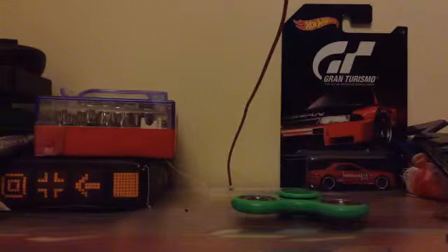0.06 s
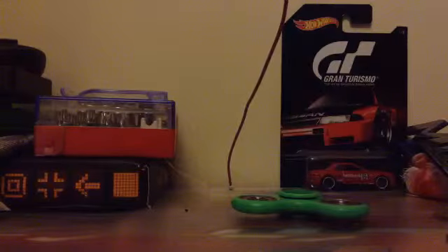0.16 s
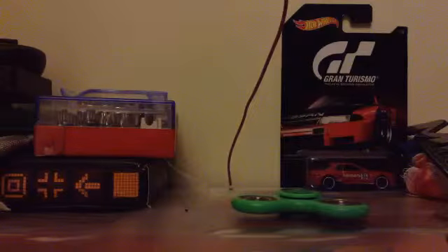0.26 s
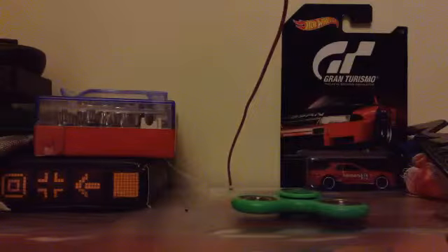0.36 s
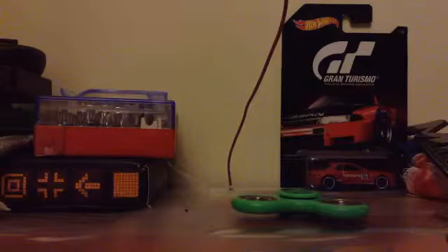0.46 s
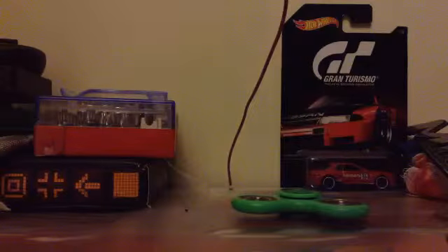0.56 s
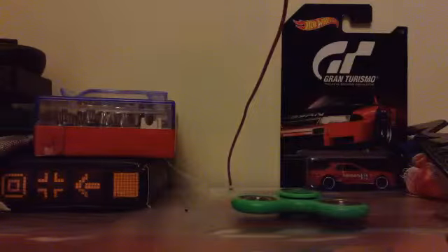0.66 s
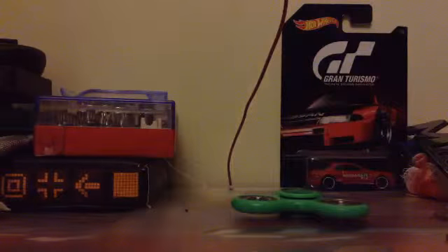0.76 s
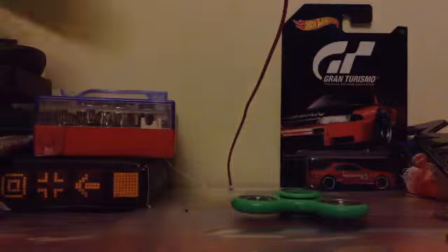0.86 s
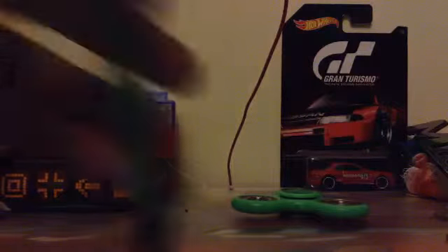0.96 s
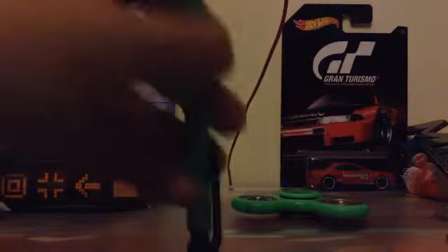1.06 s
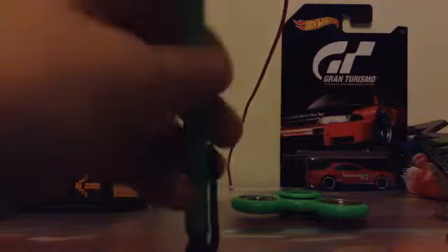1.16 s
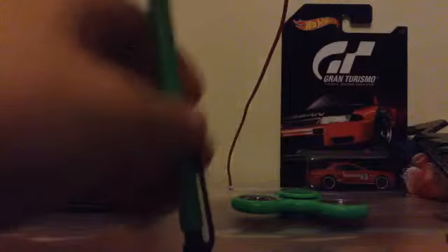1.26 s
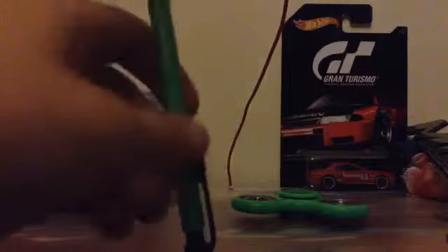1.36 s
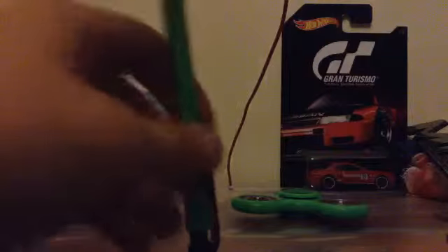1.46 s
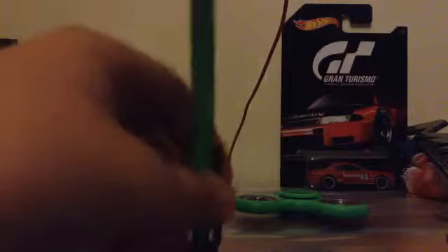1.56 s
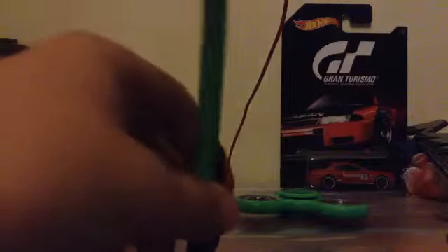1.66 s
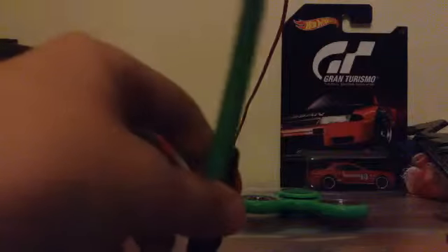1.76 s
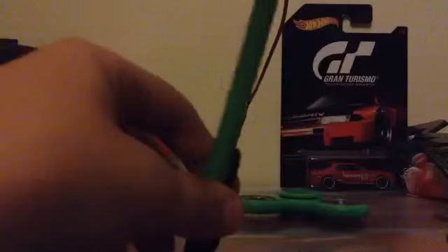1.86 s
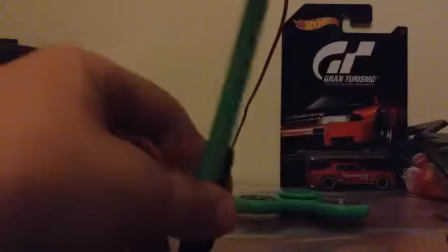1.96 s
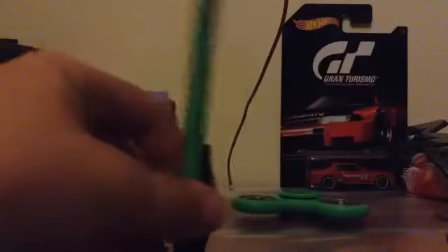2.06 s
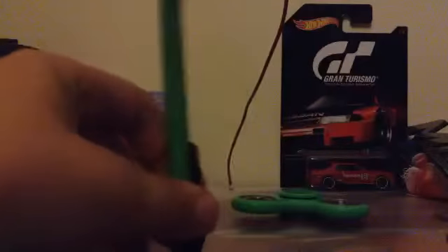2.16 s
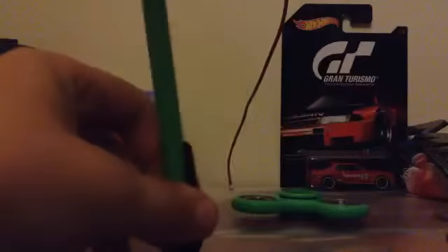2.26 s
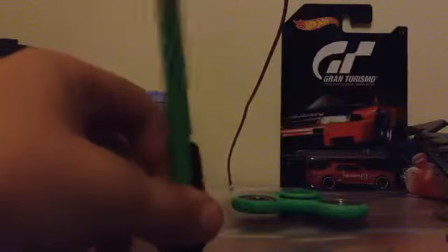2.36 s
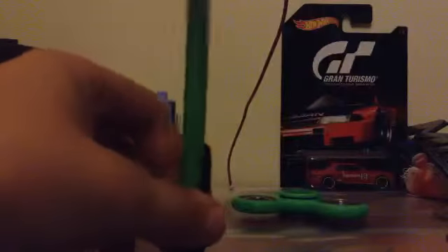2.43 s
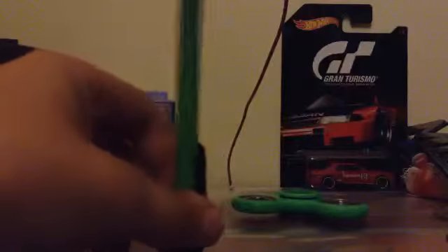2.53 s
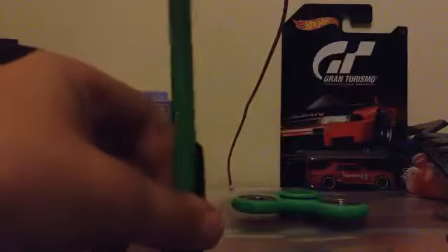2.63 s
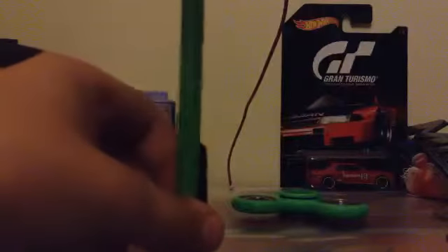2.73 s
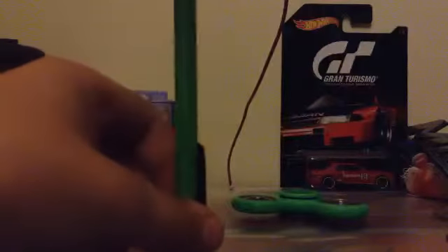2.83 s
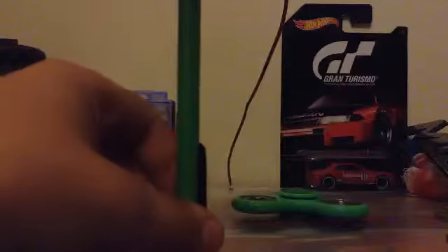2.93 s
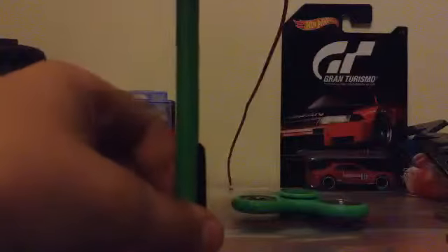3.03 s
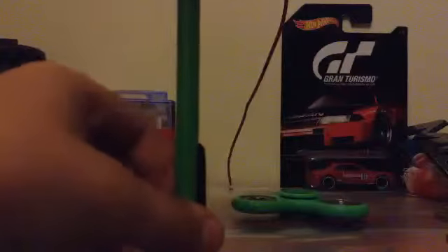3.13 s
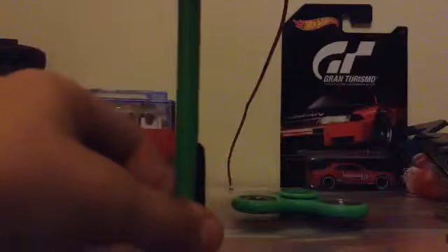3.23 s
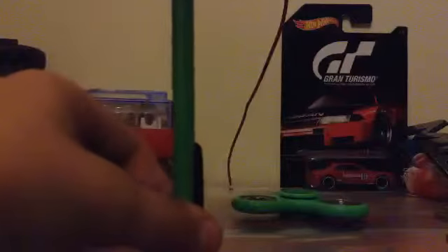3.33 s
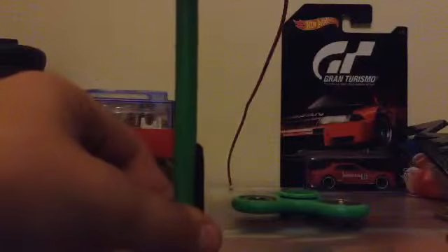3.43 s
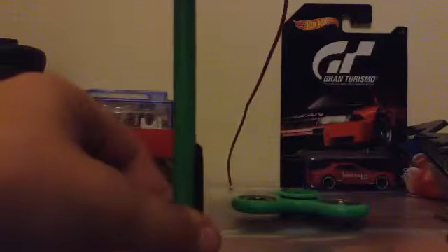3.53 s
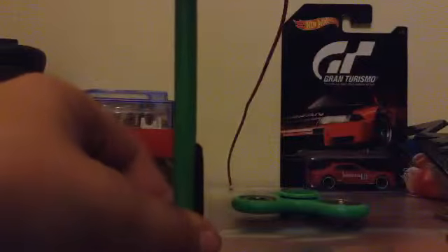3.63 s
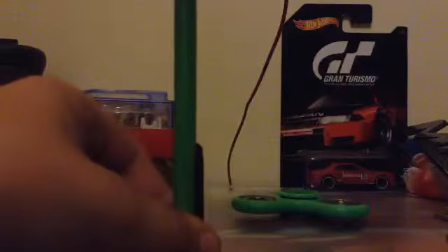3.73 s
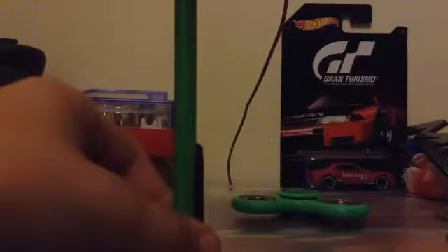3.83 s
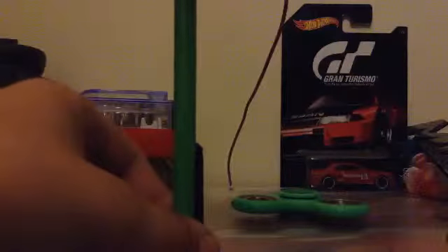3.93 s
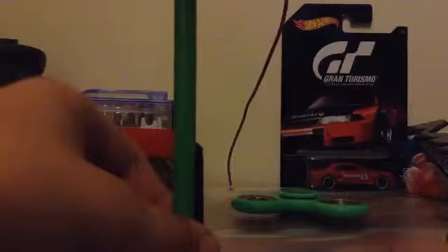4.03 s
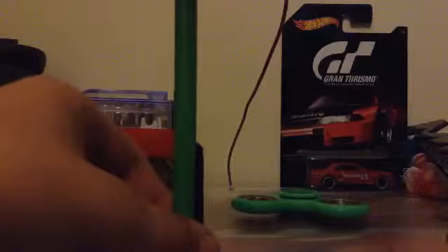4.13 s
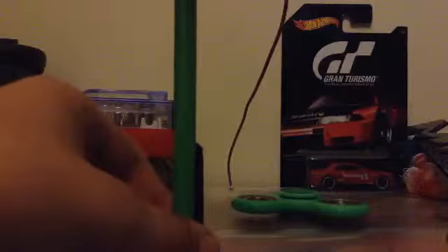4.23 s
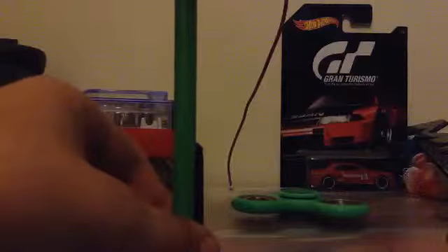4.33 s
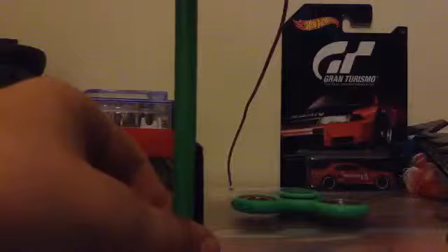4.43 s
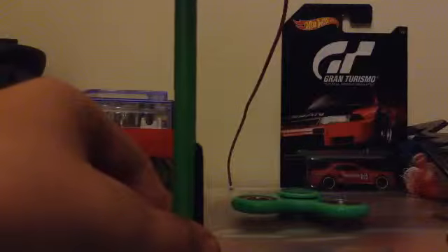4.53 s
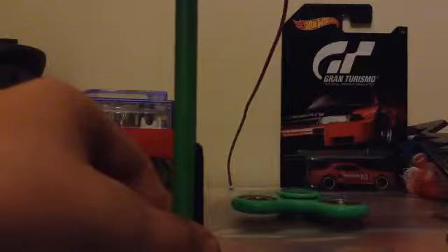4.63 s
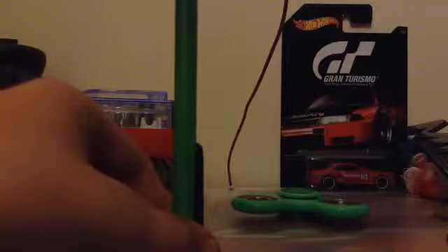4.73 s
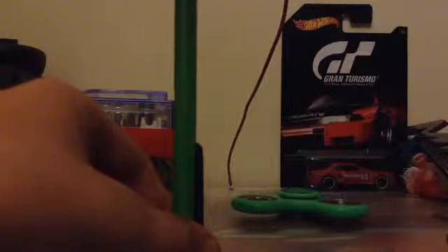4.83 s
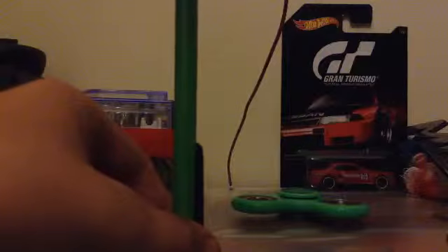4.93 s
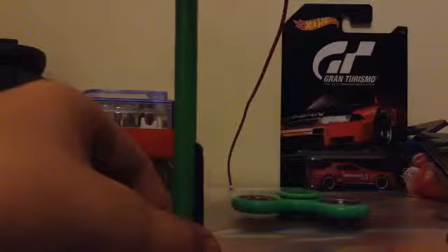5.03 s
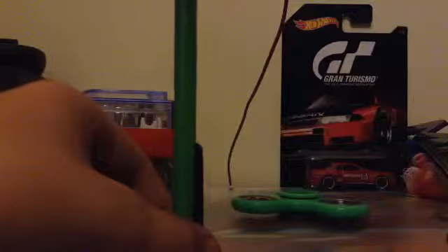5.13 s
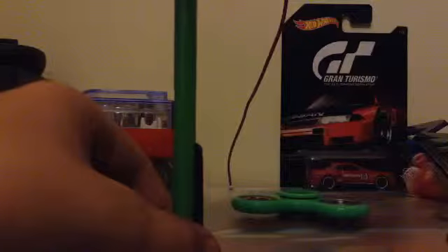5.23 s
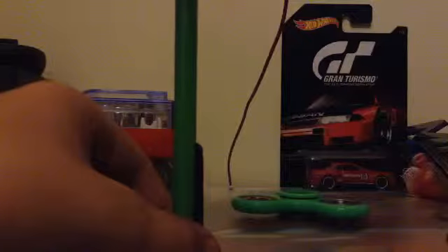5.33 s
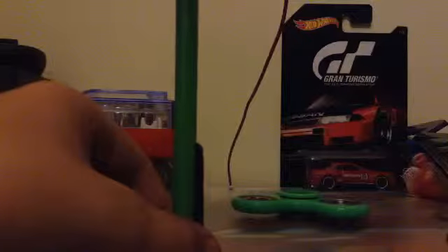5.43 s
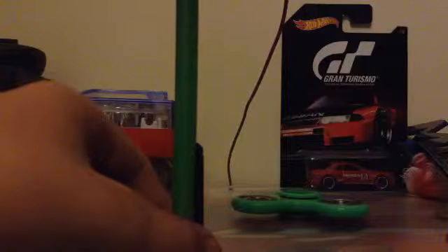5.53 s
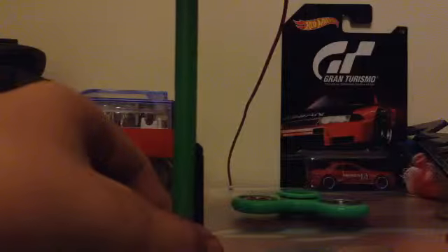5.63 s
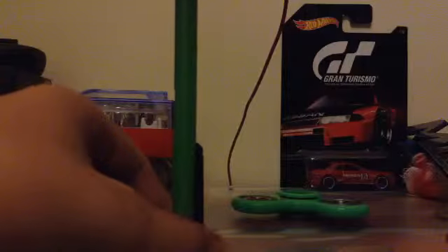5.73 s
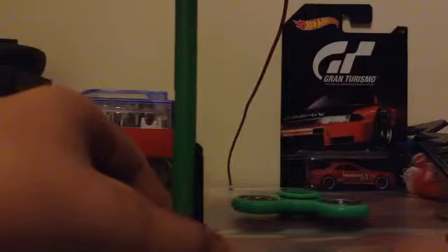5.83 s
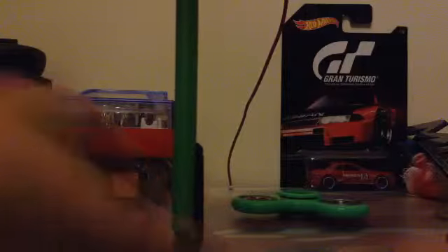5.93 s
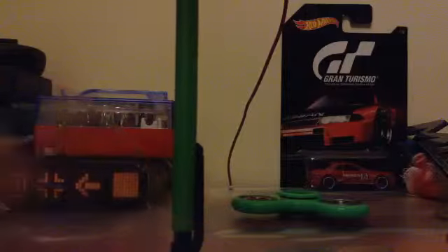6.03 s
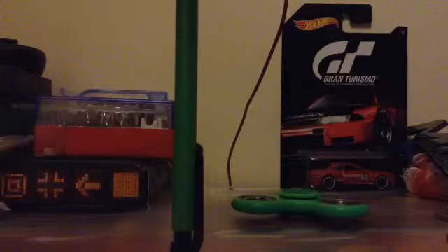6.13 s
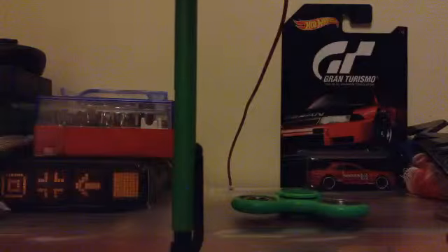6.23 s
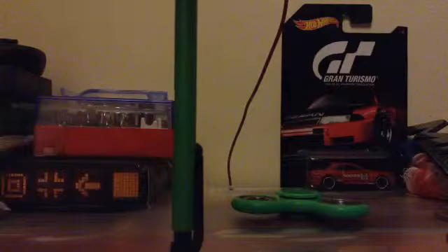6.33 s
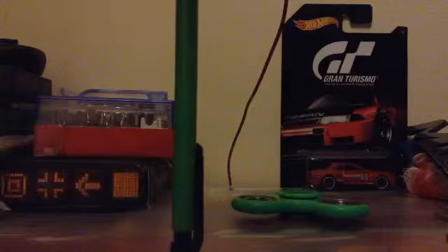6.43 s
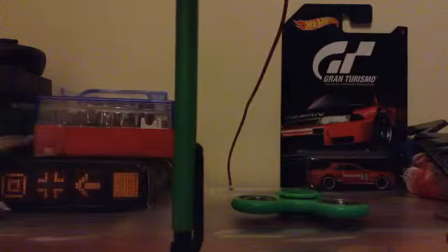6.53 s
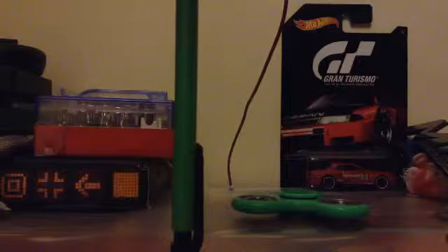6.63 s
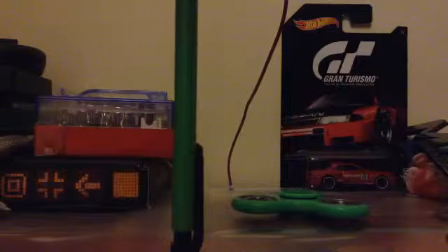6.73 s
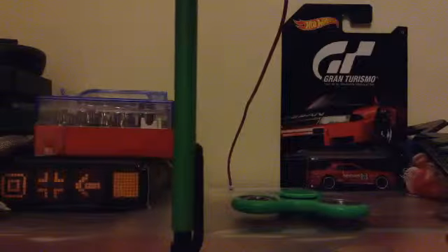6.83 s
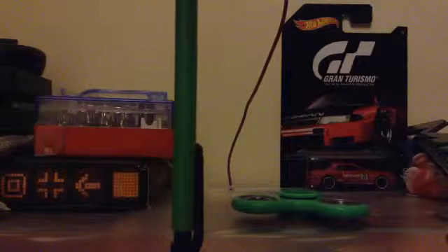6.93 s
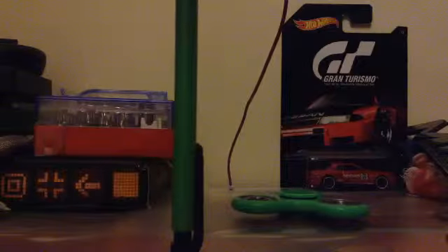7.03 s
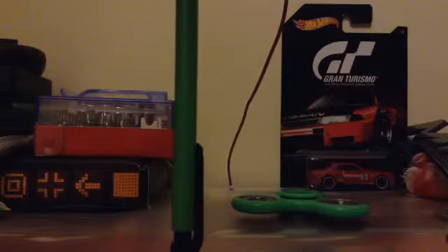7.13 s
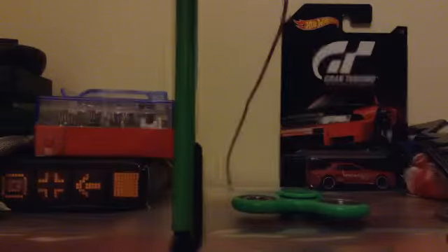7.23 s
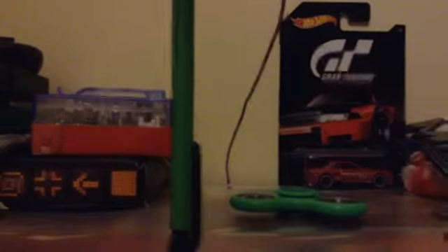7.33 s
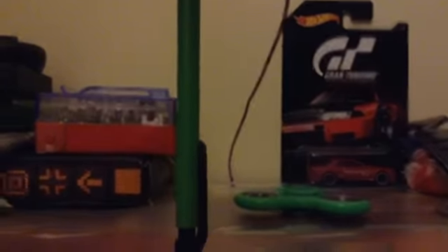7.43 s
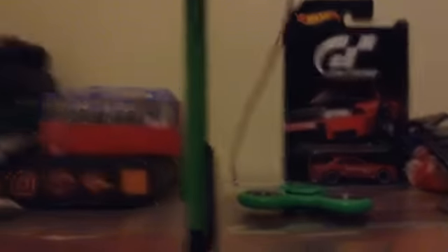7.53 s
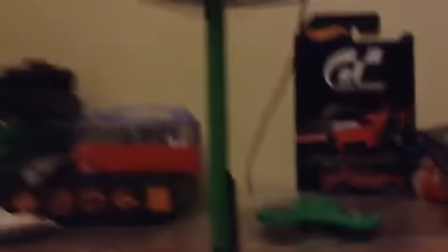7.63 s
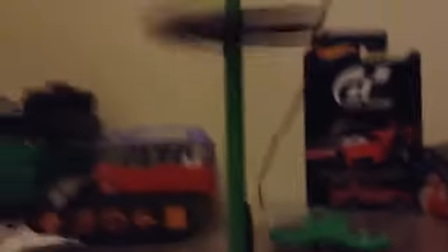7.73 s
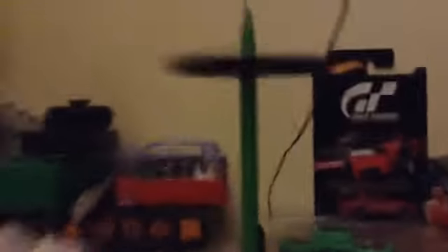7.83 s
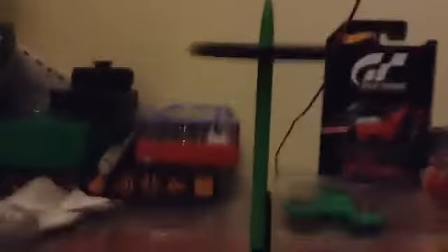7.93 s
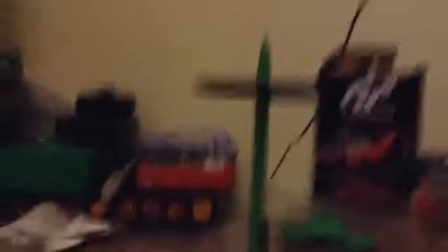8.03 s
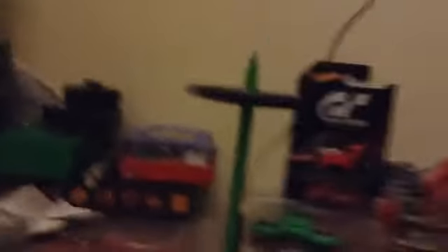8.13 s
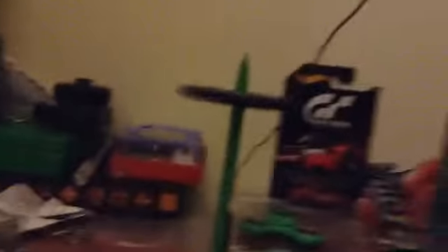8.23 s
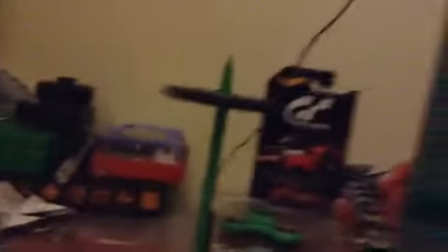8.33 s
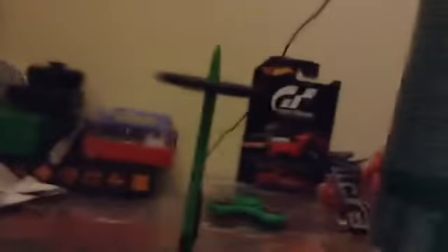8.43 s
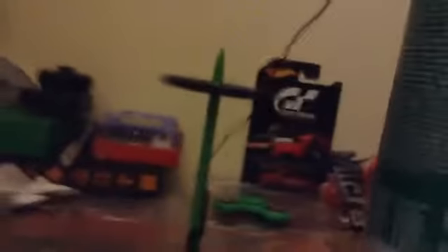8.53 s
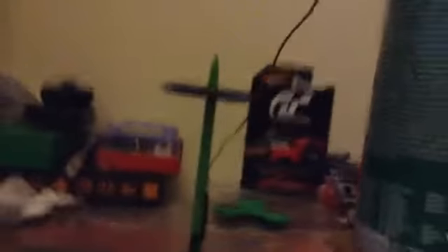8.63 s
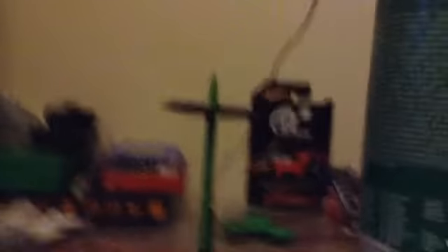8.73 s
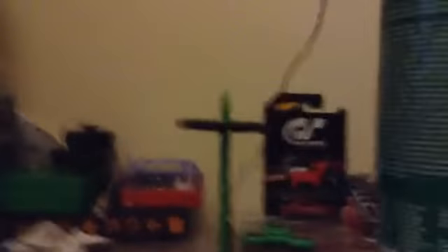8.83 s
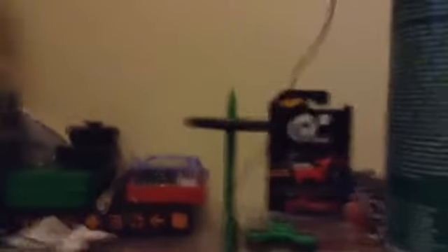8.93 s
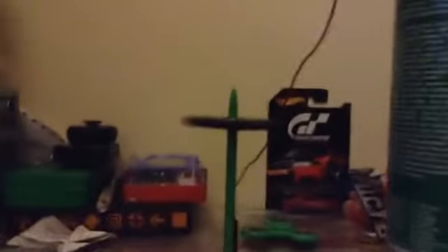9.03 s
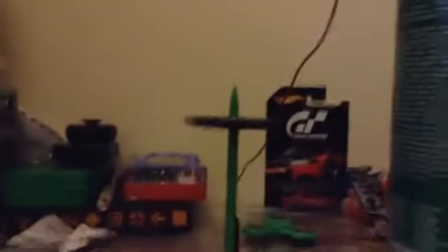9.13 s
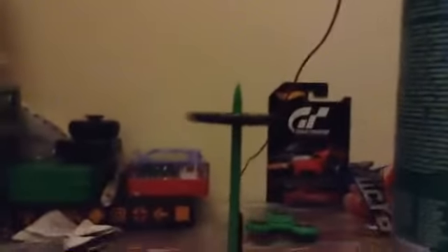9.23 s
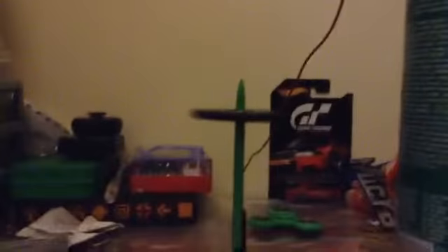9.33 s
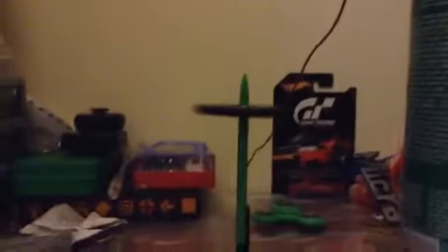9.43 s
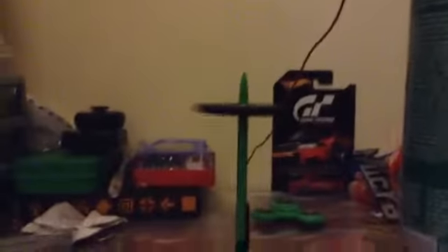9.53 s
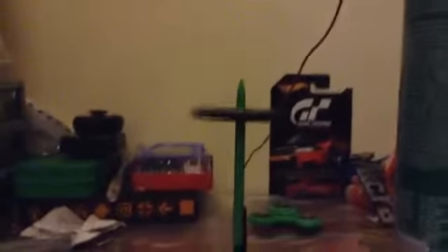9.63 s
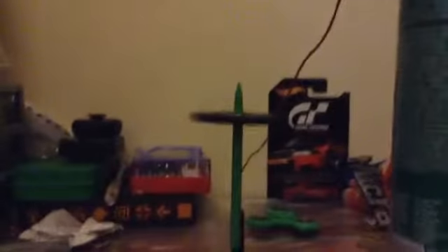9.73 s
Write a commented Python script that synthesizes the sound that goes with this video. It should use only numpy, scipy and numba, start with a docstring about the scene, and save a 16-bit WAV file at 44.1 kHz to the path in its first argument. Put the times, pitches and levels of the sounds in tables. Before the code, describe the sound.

Continuous whirring bearing hiss from a fidget spinner on a pencil, with handling thuds and ticks, buzzing desk rumble, a sharp snap, and a distant rattly ending.

```python
"""A whirring fidget spinner is carried in on a pencil, set on a desk, tilted upright, steadied and let go.
Throughout, its dry ball bearing hisses into the air and off the desk top, and rings the spinner's body.
From touchdown it also rumbles down the pencil into the desk; thuds, ticks and finger rubs mark the handling.
The foot snaps flat on release; as the rotor slows, the loose bearing rattles once a turn.
Near the end the microphone draws back. Sources are random collisions through filters and resonances."""
import sys
import numpy as np
from scipy import signal
from scipy.fft import rfft, irfft, next_fast_len
from scipy.io import wavfile
from scipy.ndimage import uniform_filter1d, map_coordinates
from numba import njit

SR = 44100
rng = np.random.default_rng(int(sys.argv[2]) if len(sys.argv) > 2 else 0)


def bounce(signal):
    """Save signal as a 16-bit WAV file at the path given by the first command-line argument."""
    frames = np.transpose(np.atleast_2d(signal))
    limited = np.clip(frames, -1, 1)
    pcm = np.round(limited * 32767).astype(np.int16)
    wavfile.write(sys.argv[1], SR, pcm)


N = 431298
T = np.arange(N) / SR

# Coasting spinner. Each row: time in seconds, turns per second in Hz, relative once-a-turn rattle.
SPIN = [(0, 40.9, 0.46), (2, 37.63, 0.67), (4.5, 34.22, 0.26), (5.2, 33.21, 1), (7.4, 31.02, 0.58),
        (7.9, 30.39, 1.75), (9.78, 28.81, 3.3)]
# Microphone distance. Each row: time in seconds, distance in metres.
DISTANCE_M = [(0, 0.42), (.38, 0.49), (.65, 0.21), (.98, 0.094), (1.35, 0.12), (1.88, 0.15), (2.27, 0.13),
              (3.1, 0.15), (3.8, 0.19), (7.55, 0.21), (8.05, 0.27), (8.8, 0.41), (9.78, 0.45)]
# Hiss colour by place. Each row: frequency in Hz, relative level in dB.
ASIDE = [(1500, -12), (1900, -16), (2210, -1), (2920, -4.5), (3780, -11.5), (4700, -8), (5560, -4.5),
         (6940, -4.5), (7640, -11.5), (9450, -5), (10300, -10), (11300, -14), (12900, -23), (15000, -17)]
PASSING = [(880, -33), (1500, -5), (2620, -5), (3270, -7), (4840, 4.5), (5710, 4.5), (7010, 4.5),
           (8520, -2), (10400, 2.5), (12100, -6), (14300, 4.5), (15400, -19)]
IN_HAND = [(2100, -22), (2280, -8), (2790, -13.5), (3520, -2), (4230, -10.5), (5090, -2), (6220, -8.5),
           (7050, -2), (8680, -4), (9920, 0), (11600, -8.5), (14200, -1), (15400, -2.5)]
STANDING = [(1400, -4), (2210, -1.5), (2770, -5.5), (3110, -9.5), (3670, -1.5), (4200, -11.5), (5000, -1.5),
            (5650, -3.5), (6030, -28), (6400, -21), (6820, 0.5), (9520, -7), (10500, -1), (11400, -20),
            (14200, 3.5), (15400, -6)]
DISTANT = [(1350, -13), (1850, 1.5), (2250, -1), (2670, -2), (2920, -11), (3700, -2), (4540, -14),
           (4950, -7), (6400, -23), (8330, -12.5), (10100, 2), (11500, -22), (14300, -14.5)]
# Each place gives way to the next. Each row: start in seconds, end in seconds.
PLACE_MOVES = [(.47, 0.93), (1.4, 2.03), (3.0, 5.95), (7.55, 8.96)]
# Hiss bands that flicker independently: edges in Hz.
HISS_EDGES_HZ = [20, 2800, 4500, 8200, 11500, 20000]
# Song of the steel races. Each row: time in seconds, level against the hiss in dB.
RACE_LEVEL_DB = [(.8, -31), (1.35, -10.5), (5.5, -5.5), (6.5, -1.5), (7.6, -3), (8.6, -12.5)]
# Race resonances. Each row: frequency in Hz, relative width, then relative level in dB
# in hand, standing and from afar.
RACE_MODES = [(3640, 110, -7, -11, -1), (6650, 490, 7, 4.5, -1), (7110, 480, 9, -1, 2)]
# The hand cups the bearing. Each row: time in seconds, length in seconds, centre in Hz,
# level against the hiss in dB.
CUPPINGS = [(.21, .13, 6250, -6), (.34, 0.15, 3320, -5.5), (0.612, 0.26, 6070, -7),
            (1.333, 0.32, 7200, -3.5), (1.633, 0.37, 3320, -7.5), (2.29, 0.23, 3410, -9.5),
            (4.012, 1.2, 2830, -12)]
# Desk-top reflection of the hiss. Each row: time in seconds, lag in ms, share of the direct sound.
MIRROR = [(.3, 0.3, 0.13), (.62, 0.29, 0.29), (.97, 0.14, 0.19), (1.15, 0.083, 0.22), (1.4, 0.13, 0.024),
          (7.5, 0.1, 0.027), (7.7, 0.19, 0.3), (8.0, 0.27, 0.22)]
# Each grip gives way to the next, the last back to afar. Each row: start in seconds, end in seconds.
GRIPS = [(1.1, 1.2), (2.0, 3.07), (4.3, 4.7), (5.9, 6.3), (7.55, 8.1)]
# Spinner and pencil resonances. Each row: frequency in Hz, relative width, then relative level in dB
# from afar (also before touchdown), tilted, pressed upright, touched lightly and standing free.
BODY_MODES = [(772.5, 52, -10, -3.5, -8, -14, -8.5), (837, 168, -16, -7, -0.5, -2, -3),
              (990, 72, -0.5, -8.5, -1.5, -4.5, 0), (1013, 98, -13, -13, -1.5, -12, -15),
              (1585, 55, -0.5, -11, -17, -10.5, -10), (1670, 192, -5, -7.5, 0, -5.5, -4),
              (1930, 186, -2, -15, -11, -3.5, -0.5), (2714, 180, -3, -10.5, -10, -30, -10)]
# Desk resonances. Each row: frequency in Hz, relative width, then relative level in dB
# with the foot skidding, under the hand's weight and unloaded.
DESK_MODES = [(132, 26.4, -6, -9, 1), (208.3, 27, -2.5, 3, 0.5), (267, 36.4, 2, 3.5, 1),
              (376.6, 27, -2, -6.5, -5.5), (512, 160, -1.5, -8.5, -5.5)]
# Hand pressing the pencil on the desk. Each row: time in seconds, gain in dB.
PRESS_DB = [(1.25, 14), (2.4, 7), (2.5, 13), (3.2, 11.5), (4.05, 12), (4.55, 7), (6.2, 2)]
# The foot eases off the desk. Each row: start in seconds, end in seconds, contact loss in dB.
LIFTS = [(2.223, 2.27, 7), (2.33, 2.362, 7), (2.824, 2.875, 18), (2.925, 3.048, 22), (3.354, 3.575, 24)]
# Struck desk. Each row: frequency in Hz, relative level in dB, t60 in seconds.
DESK_RING = [(134, -7, 0.19), (215, 0, 0.16), (268, -0.5, 0.1), (362, -3, 0.093), (513, -3.5, 0.052),
             (850, 4, 0.028), (1650, 13, 0.026)]
# Bumps of hand and foot. Each row: time in seconds, peak in dB, contact in ms, best-rung Hz at that spot.
BUMPS = [(0.098, -43, 0.3, 216), (1.043, -31.5, 1.1, 380), (1.056, -29, 1.5, 350),
         (1.1294, -15.5, 0.51, 246), (1.229, -31.5, 0.8, 400), (1.337, -31, 0.54, 880),
         (1.398, -30, 1, 880), (1.447, -30, 1.2, 400), (1.627, -35, 2.4, 240), (2.749, -33, 0.56, 280)]
# Dead knock of the snapping foot. Each row: frequency in Hz, relative level in dB, t60 in seconds.
SNAP_RING = [(303, 1, 0.035), (493, 11, 0.011), (654, 12, 0.012)]
# Ticks of the balls in their cage. Each row: time in seconds, peak in dB.
TICKS = [(1.146, -17.5), (1.2891, -21), (1.3418, -18), (1.4014, -24), (5.882, -18.5), (6.4898, -32),
         (6.903, -31)]
# Tick colour. Each row: frequency in Hz, relative level in dB.
STEEL = [(4500, -3.5), (7300, -2), (8700, -2), (12000, -15), (14500, 0.5)]
# Extra hard landings of the slowing rotor. Each row: time in seconds, peak in dB.
CLACKS = [(7.8332, -35.5), (8.0073, -32.5), (8.0406, -38.5), (8.174, -39), (8.2637, -35.5), (8.4383, -42),
          (8.7065, -44), (8.942, -43), (8.971, -36.5), (9.416, -42), (9.7357, -40)]
# Clack colour. Each row: frequency in Hz, relative level in dB.
PLASTIC = [(1100, -4.5), (3800, -1), (5500, -17)]
# Fingers sliding on the pencil. Each row: time in seconds, length in seconds, level in dB.
RUBS = [(0.869, 0.016, -44), (0.911, 0.081, -47.5), (6.07, 0.13, -44), (6.128, 0.017, -46)]
# Skin friction colour. Each row: frequency in Hz, relative level in dB.
SKIN = [(170, -1), (400, -2), (900, 0.5), (3000, 4), (4500, -5), (15000, -8)]
# Quiet room colour. Each row: frequency in Hz, relative level in dB.
ROOM = [(40, -14), (110, -12.5), (220, -6), (1000, -3), (15000, -7)]

# bearing layers at 1 m and starting speed, before contact gains
HISS_DB, RING_DB, RUMBLE_DB = -56.5, -64, -78.5
SPEED_POWER = 1.0
KNOCK_S = 9.147  # one moment at which the rotor falls across its play
TOUCH_S, SEAT_S = 1.099, 0.18  # foot first meets the desk; time to seat
LIFT_RAMP_S = 0.016
SNAP_S, SNAP_DB = 5.8845, -21  # foot snaps flat as the fingers leave
ROCK_S, ROCK_DB = 0.282, 9  # free pencil then rocks: duration, extra rumble
# the desk is the ring's sounding board: share of pressure dB, share of lift dB, offset in mid-air
RING_PRESS_SHARE, RING_LIFT_SHARE, RING_AIRBORNE_DB = 0.59, 0.16, -12.5
# leaning pencil rolls on its foot's edge: ring offset, rms wander and widening of modes as shares
TILT_DB, TILT_BEND, TILT_WIDEN = -4, .06, .7
RUMBLE_AFAR_DB, RING_AFAR_DB = -5, -0.95  # extra loss after the microphone draws back
SPOT_DB_PER_OCTAVE = 8.5  # loss of desk modes away from the spot's pitch
TOP_HZ = 15400


def undb(db):
    """Decibels to gain."""
    return 10 ** (np.asarray(db) / 20)


def unit(x):
    """Scale to rms 1."""
    return x / np.sqrt(np.mean(x ** 2))


def even(x):
    """Hold the power near 1 over a few turns, keeping faster flutter."""
    power = np.abs(uniform_filter1d(x ** 2, SR // 6))
    return x / np.sqrt(power + 1e-12)


def curve(rows, axis=1):
    """One table column, joined by straight lines in time."""
    rows = np.array(rows)
    return np.interp(T, rows[:, 0], rows[:, axis])


def ramp(start_s, length_s):
    """Rise from 0 to 1."""
    return np.clip((T - start_s) / length_s, 0, 1)


def spell(start_s, end_s, edge_s):
    """1 between two moments, with sloping edges."""
    return ramp(start_s - edge_s / 2, edge_s) - ramp(end_s - edge_s / 2, edge_s)


def swell(centre_s, length_s):
    """Bell-shaped rise and fall, peak 1."""
    return np.exp(-(2 * (T - centre_s) / length_s) ** 2)


def blend(states, moves):
    """Pass from each state to the next during its (start s, end s)."""
    out = states[0]
    for (start_s, end_s), state in zip(moves, states[1:]):
        share = ramp(start_s, end_s - start_s)
        out = (1 - share) * out + share * state
    return out


def walk(rate_hz):
    """Random levels held 1 / rate_hz s, slewed twice, rms 1."""
    hold = int(SR / rate_hz)
    steps = np.repeat(rng.standard_normal(N // hold + 1), hold)
    slewed = uniform_filter1d(uniform_filter1d(steps, hold), hold)
    return unit(slewed[:N])


def colour(x, points):
    """Filter by a (Hz, dB) spectrum, falling 12 dB per octave more below its first point; rms 1."""
    hz, db = np.transpose(points)
    size = next_fast_len(N)
    f = np.maximum(np.arange(size // 2 + 1) * SR / size, 1)
    gain = undb(np.interp(np.log(f), np.log(hz), db))
    gain = gain * np.minimum(f / hz[0], 1) ** 2
    return unit(irfft(rfft(x, size) * gain, size)[:N])


def add(out, start_s, sound):
    """Mix a short sound in at start_s."""
    i = int(start_s * SR)
    out[i:i + len(sound)] += sound[:N - i]


@njit
def bandpass(x, hz, width_hz):
    """State-variable resonance whose centre and width may move every sample."""
    y, band, low = np.empty(len(x)), 0., 0.
    for i in range(len(x)):
        g, k = np.tan(np.pi * hz[i] / SR), width_hz[i] / hz[i]
        v = (band + g * (x[i] + 1e-18 - low)) / (1 + g * (g + k))
        band, low, y[i] = 2 * v - band, low + 2 * g * v, k * v
    return y


def impacts(load, per_s, spread_db):
    """Dense tiny collisions of random sign and size, scaled by the load."""
    hits = (rng.random(N) < per_s / SR) * rng.choice([-1, 1], N)
    size_db = spread_db * np.minimum(rng.exponential(size=N), 5)
    return even(hits * undb(size_db) * load)


def resonate(load, modes, moves, per_s, spread_db, blows=0, unsteady=0):
    """Modes rung by their own collisions and shared blows; an unsteady grip bends and widens them."""
    out = 0
    widen = np.ones(N) + TILT_WIDEN * unsteady
    bend = 1 + TILT_BEND * unsteady * walk(6)
    for hz, width, *db in modes:
        centre_hz = hz * bend
        width_hz = 1.79 * width * widen
        drive = impacts(load, per_s, spread_db) + blows
        # two passes leave dark valleys between modes
        voice = bandpass(bandpass(drive, centre_hz, width_hz), centre_hz, width_hz)
        gain = blend(undb(db + db[:1]), moves)  # first state may return last
        out = out + gain * unit(voice / np.sqrt(width_hz))
    return even(out)


def struck(modes, contact_ms):
    """Decaying modes pushed by a rounded blow; peak 1."""
    t = T[:SR // 4]
    ring = sum(undb(db - 60 * t / t60_s) * np.cos(2 * np.pi * hz * t) for hz, db, t60_s in modes)
    push = np.sin(np.pi * np.minimum(1000 * t / contact_ms, 1))
    y = signal.fftconvolve(ring, push)[:len(t)]
    return y / np.abs(y).max()


def room_floor():
    """Quiet room: steady coloured noise."""
    return undb(-62.5) * colour(rng.standard_normal(N), ROOM)


def small_room(x, t60_s=0.051, wet_db=-14):
    """Short diffuse tail from the walls and the clutter on the desk."""
    t = T[:SR // 3]
    tail = rng.standard_normal(len(t)) * undb(-60 * t / t60_s) * (t > .002)
    return x + undb(wet_db) * signal.fftconvolve(x, tail / np.linalg.norm(tail))[:N]


def sliding_fingers():
    """Skin friction: coloured random impacts swelling with each rub."""
    skin = colour(impacts(1, per_s=900, spread_db=3.0), SKIN)
    return skin * sum(undb(db) * swell(s, length_s) for s, length_s, db in RUBS)


def desk_bumps():
    """Dull thuds ring the desk, each spot favouring modes near its own pitch."""
    out = np.zeros(N)
    for s, db, contact_ms, spot_hz in BUMPS:
        modes = []
        for hz, mode_db, t60_s in DESK_RING:
            loss_db = SPOT_DB_PER_OCTAVE * abs(np.log2(hz / spot_hz))
            modes.append((hz, mode_db - loss_db, t60_s))
        add(out, s, undb(db) * struck(modes, contact_ms))
    return out


def foot_snap(crack_db=-23, crack_decay_s=.0007):
    """The foot snaps flat: a dead modal knock with a bright crack of differenced noise on top."""
    out, t = np.zeros(N), T[:SR // 50]
    add(out, SNAP_S, undb(SNAP_DB) * struck(SNAP_RING, contact_ms=0.21))
    crack = np.diff(rng.standard_normal(len(t) + 1)) * np.exp(-t / crack_decay_s)
    add(out, SNAP_S, undb(crack_db) * crack)
    return out


def bursts(events, material, decay_s):
    """Short decaying grains of coloured noise, each scaled to its peak."""
    out, t = np.zeros(N), T[:SR // 50]
    grain = colour(rng.standard_normal(N), material)
    for s, db in events:
        burst = grain[int(s * SR):][:len(t)] * np.exp(-t / decay_s)
        add(out, s, undb(db) * burst / np.abs(burst).max())
    return out


def handling():
    """Bumps, the snap, steel cage ticks, plastic rotor clacks and sliding fingers."""
    ticks = bursts(TICKS, STEEL, decay_s=0.0067)
    clacks = bursts(CLACKS, PLASTIC, decay_s=0.0051)
    return desk_bumps() + foot_snap() + ticks + clacks + sliding_fingers()


def lifted_db():
    """Contact lost whenever the foot eases off the desk."""
    return sum(db * spell(start_s, end_s, LIFT_RAMP_S) for start_s, end_s, db in LIFTS)


def desk_rumble(knock):
    """From touchdown the pencil feeds bearing roughness into the desk, more when pressed harder."""
    load = (1 + 1.0 * knock) * undb(3.1 * walk(25))
    rumble = resonate(load, DESK_MODES, GRIPS[1:3], per_s=970, spread_db=3.5)
    rocking_db = ROCK_DB * spell(SNAP_S, SNAP_S + ROCK_S, LIFT_RAMP_S)
    afar_db = blend([0, RUMBLE_AFAR_DB], GRIPS[4:])
    level_db = RUMBLE_DB + curve(PRESS_DB) - lifted_db() + rocking_db + afar_db
    return rumble * ramp(TOUCH_S, LIFT_RAMP_S) * undb(level_db)


def tilted():
    """1 while the pencil leans in the hand on the desk, 0 once upright."""
    return blend([0, 1, 0], GRIPS[:2])


def ring_db():
    """The ring swells at touchdown, follows the pressure and weakens with tilt, lift and withdrawal."""
    seated = ramp(TOUCH_S, SEAT_S)
    airborne_db = RING_AIRBORNE_DB * (1 - seated)
    pressed_db = RING_PRESS_SHARE * curve(PRESS_DB) * seated - RING_LIFT_SHARE * lifted_db()
    afar_db = blend([0, RING_AFAR_DB], GRIPS[4:])
    return RING_DB + airborne_db + pressed_db + TILT_DB * tilted() + afar_db


def body_ring(knock, chatter, blow_db=25):
    """Collisions ring the plastic rotor and pencil in clumps; each contact adds one clean blow."""
    clumps = undb(2.5 * walk(55) / (1 + knock))
    load = (1 + 0.59 * knock) * undb(0.81 * chatter) * clumps
    crest = (knock > np.roll(knock, 1)) & (knock >= np.roll(knock, -1))
    blows = undb(blow_db) * knock * crest
    ring = resonate(load, BODY_MODES, GRIPS, per_s=3000, spread_db=2.0, blows=blows, unsteady=tilted())
    return ring * undb(ring_db())


def cupped_hand(width_hz=260):
    """Hollow resonances in the hiss: narrow noise on a carrier, swelling as the hand changes shape."""
    lowpass = signal.butter(2, width_hz, fs=SR, output="sos")
    grain = unit(signal.sosfilt(lowpass, rng.standard_normal((2, N))))
    out = 0
    for s, length_s, hz, db in CUPPINGS:
        phase = 2 * np.pi * hz * T
        hollow = grain[0] * np.cos(phase) + grain[1] * np.sin(phase)
        out = out + undb(db) * swell(s, length_s) * hollow
    return out


def singing_races(knock, chatter):
    """Steel races rung by dense collisions, loudest while near and upright."""
    load = (1 + 0.58 * knock) * undb(0.91 * chatter + 2.0 * walk(30))
    races = resonate(load, RACE_MODES, PLACE_MOVES[2:], per_s=5000, spread_db=2.0)
    return undb(curve(RACE_LEVEL_DB)) * races


def air_hiss(knock, chatter):
    """Bearing heard directly: flickering bands of collisions, coloured by place, plus races and cupping."""
    drive = 0
    for low_hz, high_hz in zip(HISS_EDGES_HZ, HISS_EDGES_HZ[1:]):
        flicker_db = 1.98 * walk(300) + .8 * walk(14)
        load = (1 + 0.52 * knock) * undb(.5 * chatter + flicker_db)
        band = signal.butter(4, [low_hz, high_hz], "band", fs=SR, output="sos")
        drive = drive + signal.sosfilt(band, impacts(load, per_s=16000, spread_db=2.0))
    places = [colour(drive, place) for place in (ASIDE, PASSING, IN_HAND, STANDING, DISTANT)]
    air = blend(places, PLACE_MOVES)
    return (air + singing_races(knock, chatter) + cupped_hand()) * undb(HISS_DB)


def desk_mirror(x):
    """Add the desk-top reflection, whose changing lag moves broad peaks and notches."""
    share = curve(MIRROR, axis=2)
    late = map_coordinates(x, [(T - curve(MIRROR) / 1000) * SR], mode="mirror")
    return (x + share * late) / np.sqrt(1 + share ** 2)


def rattle(width_turns, scatter_db, jitter_turns, graze_turns=.13, graze_share=0.062):
    """Ball load: once a turn the unbalanced rotor crosses the bearing's play, grazing, then landing."""
    turns = np.cumsum(curve(SPIN)) / SR
    turns += (.5 - np.interp(KNOCK_S, T, turns)) % 1  # landings at half turns
    chance = rng.standard_normal((500, 2))[turns.astype(int)]  # one draw per turn
    offset = turns % 1 - .5 - jitter_turns * chance[:, 0]
    landing = np.exp(-np.abs(offset) / width_turns)
    graze = graze_share * np.exp(-np.abs(offset + graze_turns) / width_turns)
    return curve(SPIN, axis=2) * undb(scatter_db * chance[:, 1]) * (landing + graze)


def carry():
    """Bearing layers fade with speed and fall with distance."""
    speed_hz = curve(SPIN)
    return (speed_hz / speed_hz[0]) ** SPEED_POWER / curve(DISTANCE_M)


def scene():
    """One bearing drives the air, the spinner's body and the desk."""
    knock = rattle(width_turns=0.031, scatter_db=1.4, jitter_turns=0.014)
    chatter = walk(260)  # balls bunch and part in their cage
    rumble = desk_rumble(knock)
    ring = body_ring(knock, chatter)
    hiss = desk_mirror(air_hiss(knock, chatter))
    spinner = carry() * (hiss + ring + rumble)
    return (small_room(spinner + handling()) + room_floor())[None]


def record(dry, low_cut_hz=93):
    """The phone thins the bass and cuts the top."""
    high_pass = signal.butter(8, low_cut_hz, "high", fs=SR, output="sos")
    low_pass = signal.ellip(12, .2, 80, TOP_HZ, fs=SR, output="sos")
    return signal.sosfilt(low_pass, signal.sosfilt(high_pass, dry))


dry = scene()
out = record(dry)
bounce(out)
```